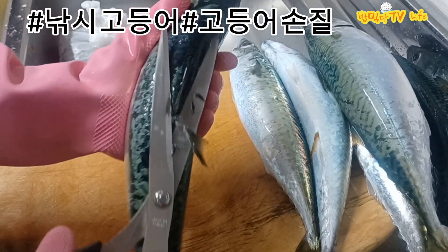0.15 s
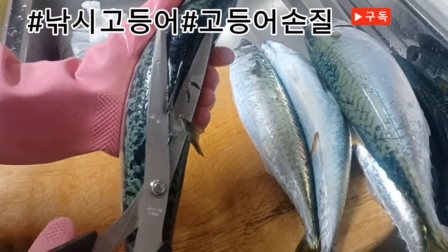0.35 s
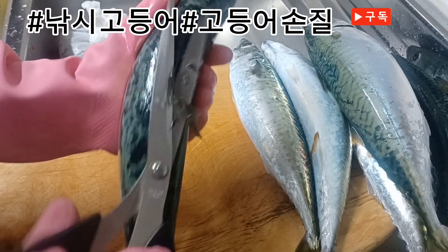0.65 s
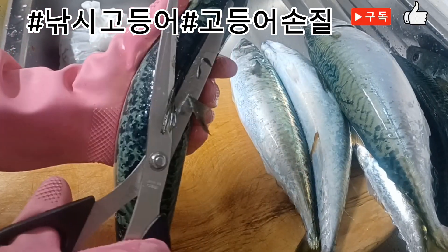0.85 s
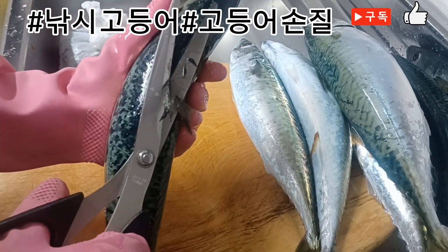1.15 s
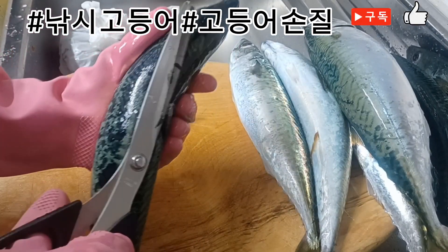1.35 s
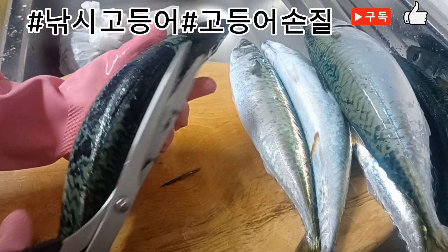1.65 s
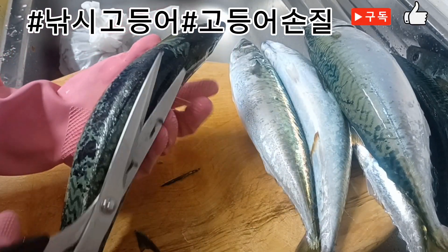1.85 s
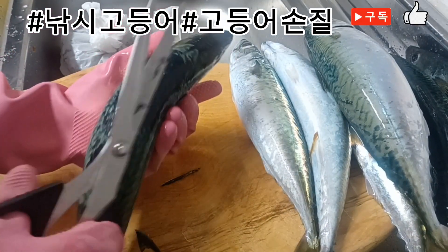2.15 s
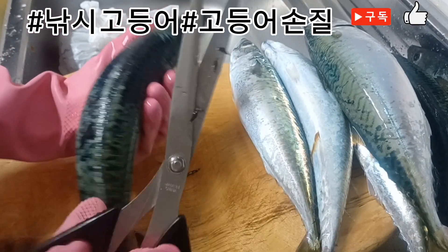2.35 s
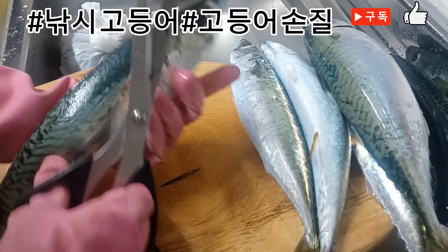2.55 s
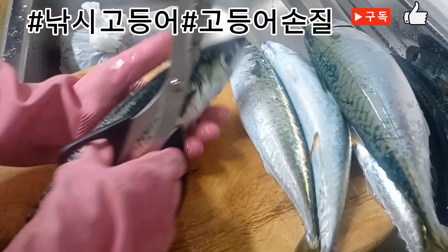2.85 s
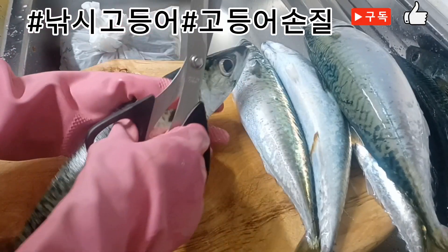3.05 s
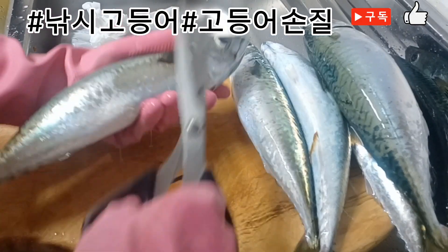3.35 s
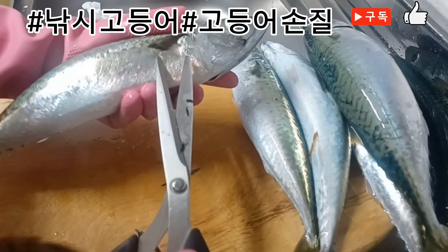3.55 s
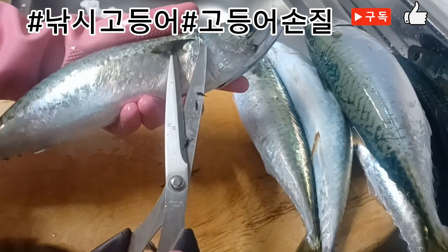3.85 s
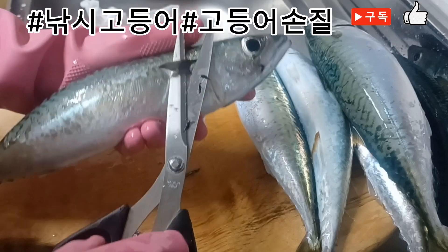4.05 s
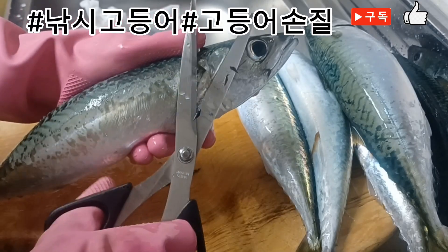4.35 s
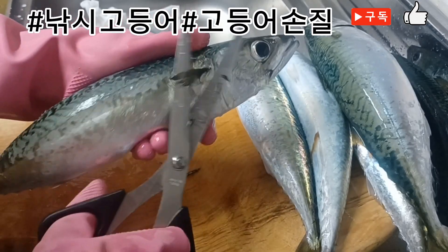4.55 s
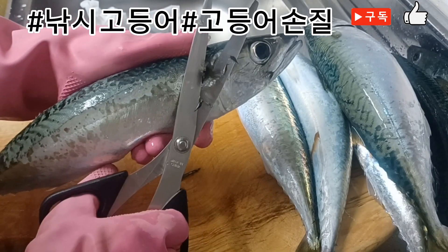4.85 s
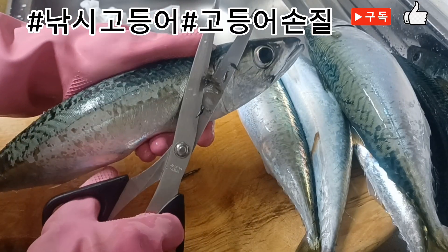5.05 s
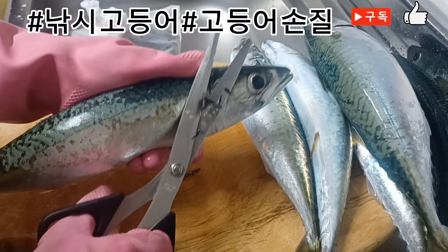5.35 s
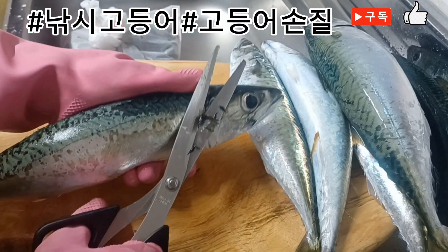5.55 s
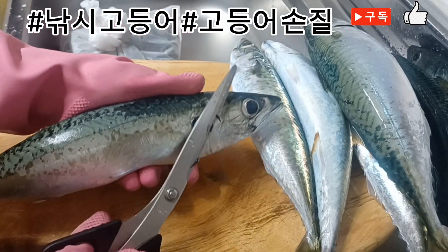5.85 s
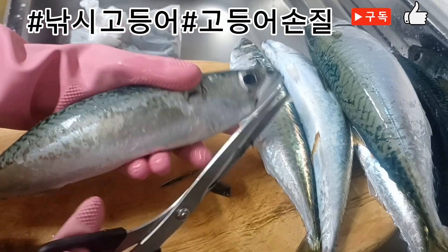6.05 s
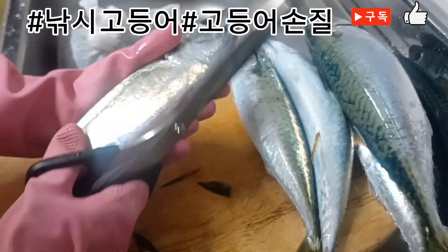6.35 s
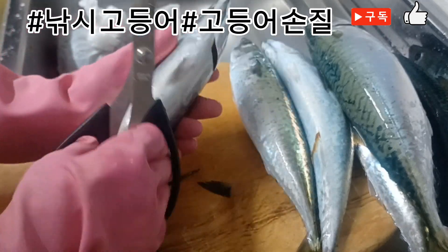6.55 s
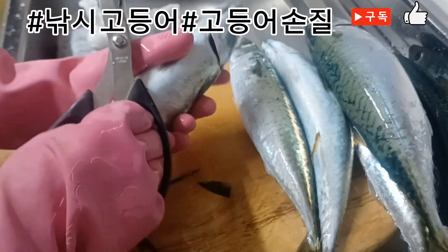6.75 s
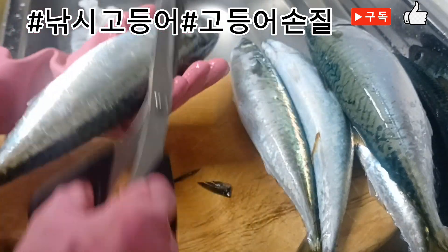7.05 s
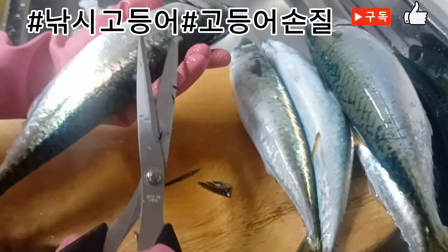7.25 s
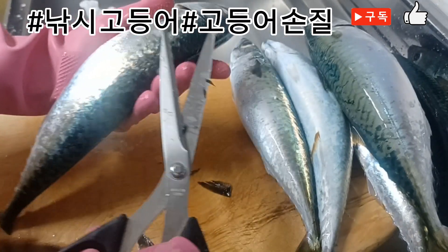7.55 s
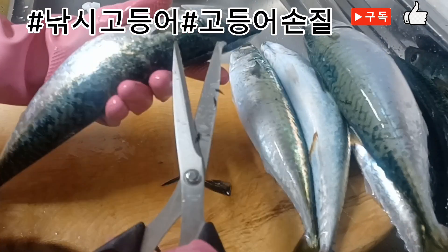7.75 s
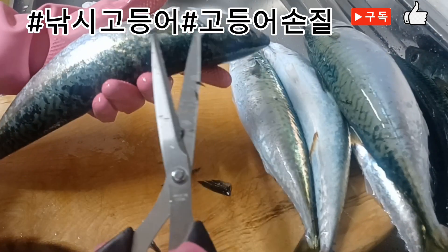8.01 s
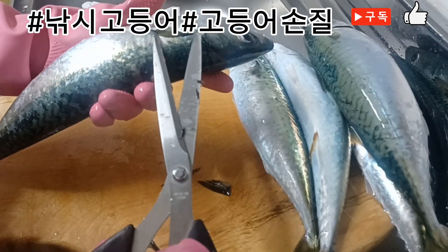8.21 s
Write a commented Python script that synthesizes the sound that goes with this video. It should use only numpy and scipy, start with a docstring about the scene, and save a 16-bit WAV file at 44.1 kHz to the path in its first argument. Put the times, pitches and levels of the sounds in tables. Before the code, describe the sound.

A close, quiet kitchen scene with short room reflections and a very faint, wavering appliance hum under soft air. In the first half second, thin wet slicing and tiny scale ticks crackle, with weak bright snips. Crisp snips follow at 0.55, 0.9 and 1.0, then two harder crunches at 1.15 and 1.3 with dull fleshy thuds and a slight steel ring. From 1.6 to 4 the gloves rub in short, grainy strokes, with small rising squelches, hollow pops, light taps and a low bump at 2.6. Small snips resume at 4.1 and 4.7, thickening from 4.9 to 5.5 into rapid, splintery crunching. At 5.8 comes the loudest cut: a bright double snap, ringing blades and a deep thud. Until about 8.4, only wet rustling, occasional squelches, soft bumps and dull blade taps continue.

```python
"""In a small kitchen, scissors cut the fins off a fresh fish held in a rubber glove above a wooden board.
Fin rays snap as bursts of splintering breaks; wet skin crackles and gloves rub as clumped, coloured grains.
Squelches are slips through a rising resonance, scale ticks are short noise flicks.
Hard cuts jolt the fish with dull, sagging thuds, and struck blades ring in groups of close modes.
Behind them, an appliance hums in wavering tones over soft air noise."""
import sys
import numpy as np
from scipy import signal
from scipy.fft import rfft, irfft
from scipy.io import wavfile
from scipy.ndimage import uniform_filter1d

SR = 44100
rng = np.random.default_rng(int(sys.argv[2]) if len(sys.argv) > 2 else 0)


def waveform_to_disk(signal):
    """Save audio, clipped to [-1, 1], as 16-bit WAV at the path in sys.argv[1]."""
    frames = np.transpose(np.atleast_2d(signal))
    scaled = np.clip(frames, -1, 1) * 32767
    samples = np.round(scaled).astype(np.int16)
    wavfile.write(sys.argv[1], SR, samples)


N = 369558

# Event levels are relative: each layer adds its own trim and pan.

# kitchen air: [f/Hz, relative density/dB]
AIR_COLOUR = [(18, -61), (30, -17.5), (103, 7), (170, -8), (221, 3.5), (449, -10.5), (569, -6), (666, 0),
              (801, -3.5), (1010, -10.5), (4650, -10), (8300, -15.5), (12600, -12), (14800, -25),
              (16000, -13.5)]
AIR_DB = -63
# appliance tones: [f/Hz, level/dB, pitch waver/Hz]
HUM_TONES = [(114, -81, 3.65), (118.5, -82.5, 6.47), (559, -78.5, 16.02), (798.4, -74.5, 1.1),
             (1283, -87, 8.07)]

# gloves sliding as the fish is turned and regripped: [t/s, length/s, level/dB, hollowness re level/dB]
RUBS = [(0, 0.31, -69.5, 6.5), (0.443, 0.05, -63.5, 4), (0.7, 0.14, -68, 3.5), (1.046, 0.086, -65.5, 6),
        (1.3, 0.11, -61, 2.5), (1.618, 0.024, -64, -6), (1.714, 0.29, -63.5, -11), (2.101, 0.016, -58, -13),
        (2.18, 0.14, -70.5, 6.5), (2.336, 0.066, -59, -1), (2.484, 0.062, -61.5, -4),
        (2.557, 0.24, -65.5, 0.5), (2.816, 0.051, -55, -7), (2.901, 0.14, -60, -5),
        (3.033, 0.044, -59, 2.5), (3.075, 0.049, -57.5, 5), (3.143, 0.042, -57.5, 1.5),
        (3.225, 0.035, -64, 5), (3.246, 0.17, -64.5, 1.5), (3.483, 0.1, -60, 1.5),
        (3.595, 0.18, -60.5, -0.5), (3.829, 0.052, -58.5, -0.5), (3.977, 0.15, -66, -19),
        (4.257, 0.13, -63.5, -3), (4.542, 0.2, -60.5, -3), (4.771, 0.41, -67, 1), (5.055, 0.21, -62.5, 8.5),
        (5.33, 0.18, -64, 4.5), (5.789, 0.069, -56, 2), (5.882, 0.6, -59, -2), (6.409, 0.034, -50.5, -4.5),
        (6.474, 0.15, -56.5, -3.5), (6.648, 0.32, -61, -3), (6.828, 0.036, -52.5, -4.5),
        (6.95, 0.3, -64, -4), (7.15, 0.14, -62.5, 5.5), (7.331, 0.035, -59, -3.5), (7.48, .15, -67.5, -3),
        (7.656, 0.16, -63.5, -11), (7.781, 0.2, -58, -2.5), (8.007, 0.12, -59, -9),
        (8.225, 0.076, -56.5, -3), (8.343, .04, -63, -1.5)]
# blades slicing through wet skin: [t/s, length/s, level/dB]
SLICES = [(.065, .16, -53.5), (0.217, 0.073, -61), (.39, 0.017, -55.5), (0.432, 0.058, -53),
          (0.65, 0.11, -58), (1.668, 0.1, -61), (2.557, 0.071, -55.5), (3.9, 0.11, -60.5),
          (4.937, 0.12, -57.5), (5.163, 0.29, -61.5), (6.26, 0.12, -56), (6.751, 0.074, -57.5),
          (8.255, .05, -52.5)]
# fine crackle of wet skin: [f/Hz, relative density/dB]
CRACKLE_COLOUR = [(30, -71), (1500, -42.5), (3000, -8.5), (5000, -2.5), (7000, -4.5), (8300, -9.5),
                  (10000, -5.5), (12500, -3.5), (15000, -4), (16000, -28)]
# rubber on skin: [f/Hz, relative density/dB]
RUB_COLOUR = [(30, -13), (400, -17.5), (800, -7.5), (1150, -7), (1290, -2), (1450, -6), (1780, -1.5),
              (2200, -4.5), (3200, -5.5), (5000, -10), (7000, -23.5), (9000, -31), (16000, -42)]
# hollow undertone under the handling, with fixed resonant peaks: [f/Hz, relative density/dB]
HOLLOW_COLOUR = [(30, -8), (70, -17.5), (115, 12), (165, -13.5), (213, 1.5), (325, 0.5), (377, 7),
                 (440, -0.5), (510, 2.5), (576, 9.5), (660, 1.5), (750, 0.5), (1000, -5), (3000, -27)]
STROKE_ATTACK_S, STROKE_RELEASE_S = 0.0051, 0.028
STROKE_UNEVEN_DB, STROKE_UNEVEN_HZ = 2, 27.5   # the rubber catches and slips
GRIP_DB, GRIP_HOLLOW_DB = -73, -70   # steady floors under the strokes
RUB_WET_DB = 0.5   # crackle that comes with the rubbing, relative to it

# wet rubber squelching on the skin: [t/s, length/s, level/dB, middle f/Hz]
SQUELCHES = [(1.928, 0.032, -56.5, 1900), (1.981, 0.019, -54, 1700), (2.119, .02, -54, 1500),
             (2.211, 0.011, -57, 1400), (2.351, 0.071, -57, 1870), (3.202, 0.033, -50, 1730),
             (3.326, 0.027, -59, 1500), (3.5, 0.069, -63, 1300), (3.645, 0.014, -58, 1400),
             (3.705, 0.0097, -69, 1900), (3.845, .04, -67, 1700), (4.257, .025, -50, 1900),
             (6.051, .07, -58.5, 1400), (6.156, 0.021, -55, 1800), (6.95, .025, -62.5, 1650),
             (7.154, 0.021, -58.5, 1700), (7.356, 0.017, -62, 1810), (7.684, 0.012, -59, 2000)]
SQUELCH_WIDTH_HZ, SQUELCH_GLIDE = 930, .2   # glide: rise as a share of the pitch

# single scales flicking off the blade edge: [t/s, level/dB]
SCALE_TICKS = [(.426, -57), (.173, -59), (.194, -52), (.205, -56), (.230, -56), (.241, -54), (.253, -47),
               (.441, -56), (.47, -53), (5.005, -59), (5.175, -48), (1.276, -54), (5.25, -49), (5.369, -50),
               (5.3765, -50), (6.755, -50.5), (6.795, -63)]
RANDOM_TICKS_PER_S, RANDOM_TICK_DB = 55, -7.5   # during slices; least level relative to the slice

# two swings of the hand-held fish, flesh and whole body: [f/Hz at the usual jolt level, t60/s]
FISH_MODES = [(270, 0.054), (105.6, 0.19)]
# hard cuts and regrips: [t/s, flesh level/dB, whole-body level/dB]
JOLTS = [(0.548, -55.5, -53), (0.924, -50, -64), (1.013, -48.5, -54), (1.158, -40, -53), (1.308, -37, -54),
         (1.34, -52, -47.5), (1.362, -46, -48), (1.43, -69, -53.5), (1.962, -55.5, -57.5),
         (2.6207, -48, -45), (2.6295, -41, -44), (2.657, -45, -52), (2.683, -50, -58), (2.712, -53, -46.5),
         (3.474, -56, -52.5), (5.803, -32.5, -38), (5.823, -35, -54), (5.836, -39, -26),
         (5.895, -47.5, -52), (5.925, -52, -45.5), (5.976, -75, -58), (6.061, -72, -53), (6.29, -48.5, -51),
         (6.576, -60, -51.5), (7.16, -54, -60), (7.235, -57, -57), (7.269, -56, -54.5), (7.854, -59, -48)]
SOFTENING_PER_DB, USUAL_JOLT_DB = .005, -40   # harder jolts swing lower
# hollow pops of the cupped glove on wet skin: [t/s, level/dB, f/Hz]
POPS = [(.178, -50.5, 365), (.738, -41, 376), (0.925, -45, 292), (2.123, -48, 594), (2.62, -46.5, 502),
        (2.636, -48, 365), (2.712, -51, 567), (3.222, -47, 380), (3.524, -51.5, 380), (4.6, -53, 385),
        (5.164, -39.5, 622), (5.322, -45.5, 588), (7.223, -52, 392)]
POP_T60_S = 0.09
# heavy jolts carried into the arm as a deep bump: [t/s, level/dB]
ARM_BUMPS = [(2.629, -43), (5.836, -37)]
BUMP_HZ, BUMP_T60_S = 73, 0.17

# steel blades damped by the wet fish, in groups of modes: [f/Hz, spread/Hz, relative level/dB, t60/s]
BLADE_MODES = [(3320, 220, -5, 0.16), (3860, 220, 0.5, 0.16), (5130, 350, 5, 0.061),
               (11700, 580, -7, 0.074)]
# blades breaking through and clashing: [t/s, level/dB]
CLASHES = [(1.1563, -45), (1.307, -51), (5.811, -29)]

# dull taps of blades and handles on each other, fish and glove: [t/s, level/dB]
TAPS = [(1.083, -51), (1.397, -52.5), (1.951, -59), (1.984, -55.5), (2.075, -46), (2.195, -52.5),
        (2.476, -53), (2.548, -44.5), (2.943, -47), (3.091, -58), (3.166, -48), (3.222, -67), (3.506, -58),
        (3.763, -48.5), (4.068, -54), (5.637, -50.5), (5.831, -44), (5.862, -49), (6.09, -48.5),
        (6.212, -59), (6.447, -58), (6.611, -53), (6.754, -55), (6.85, -50), (7.469, -54), (7.557, -55),
        (7.783, -47.5), (7.841, -53), (7.965, -55), (8.072, -51.5), (8.108, -46.5), (8.183, -47.5),
        (8.211, -48), (8.298, -54)]
TAP_LENGTH_S, TAP_BRIGHT_DB, TAP_SQUASH_DB, TAP_HZ, TAP_RIGHT_DB = .0035, -1.5, -1, 4510, 2.5
# fin rays snapping between the blades: [t/s, crunch time scale/s, level/dB, brightness re level/dB,
# soft-tissue squash re level/dB, f/Hz, right minus left/dB]
SNIPS = [(.073, 0.016, -60.5, 21.5, -7, 6000, 6), (.135, 0.003, -65.5, 26, -10, 6000, 4),
         (.446, .003, -56, 21, -9, 6000, 0), (.546, 0.0031, -45, 7.5, -3.5, 4530, 1),
         (.9137, .0009, -39.5, 11.5, -5.5, 7000, 0), (1.014, 0.0017, -41, 2.5, -8.5, 6550, -0.5),
         (1.156, .0015, -33.5, -1, -10, 3930, -0.5), (1.3075, 0.0027, -34, -1, -9.5, 4170, -2),
         (1.312, 0.0046, -36, 3, -5, 4280, 1), (4.133, 0.0054, -45.5, 3.5, -6.5, 8400, 2),
         (4.256, 0.0023, -47, 8.5, -6, 7500, 4), (4.272, .003, -43.5, 2, -9, 4440, 1),
         (4.661, 0.0043, -51, 3, -16, 5500, 3), (4.853, 0.002, -56.5, 0, -12, 5500, 4),
         (4.934, 0.0033, -51, 2, -9, 6570, 7), (4.953, 0.0062, -48.5, 2, -4.5, 6260, 4),
         (4.994, .002, -53.5, 6, -9, 5400, 7), (5.028, 0.0016, -46, -6, -14, 4500, 3),
         (5.06, 0.0039, -48, -2, -8, 4500, 3), (5.0905, 0.00092, -46.5, 3, -19, 4400, 3),
         (5.1, 0.0054, -45.5, 4, -8, 5800, 3), (5.163, .005, -52, 0, 1, 6000, 2),
         (5.174, 0.0034, -51, 7, -1, 6100, 5), (5.184, .002, -42, 2, -7, 4370, 0),
         (5.233, 0.0015, -46.5, 9.5, -5, 9000, 5), (5.251, 0.0063, -43.5, 2, -4, 4500, 3),
         (5.27, .004, -49, -7, -7, 4500, 0), (5.294, 0.00075, -41.5, 4.5, -6.5, 4330, 2),
         (5.322, 0.0035, -48.5, -14, 2.5, 4500, 1), (5.359, 0.0019, -44, 1.5, -8, 4230, 1),
         (5.377, 0.0041, -42.5, 3, -7, 4460, 3), (5.417, 0.0017, -47, 1, -0.5, 4800, 1),
         (5.454, 0.0046, -51.5, 4, -5, 4800, 3), (5.488, 0.0018, -48, 5, -4, 4170, 5),
         (5.495, 0.003, -44.5, -1, -13, 4400, 0), (5.681, 0.00097, -45.5, 0, -23, 5360, 2),
         (5.691, 0.0036, -45.5, 2, -16, 5700, 1), (5.742, 0.0034, -47.5, 3.5, -2, 4600, 2),
         (5.786, 0.0028, -48, 0, -15, 5200, -3), (5.8005, 0.0018, -31.5, 3, -7, 5200, 2),
         (5.8045, 0.003, -27, 6, -8, 3240, 2), (5.8108, 0.0017, -25.5, -0.5, -5.5, 5100, 0),
         (5.8155, 0.0028, -38, -11, -2, 5300, -4)]
# crisp top of a snap: [f/Hz, relative density/dB]
SNAP_TOP_COLOUR = [(30, -57), (5000, -33), (8300, -12), (10000, -6), (11700, -1), (13000, -1.5),
                   (14000, 1.5), (15000, -7.5), (16000, -4.5)]
# hard middle of a snap: [f/Hz, relative density/dB]
SNAP_MIDDLE_COLOUR = [(30, -7), (1300, -18), (2500, -18), (3250, -2), (5000, -1), (7000, -0.5),
                      (8400, -7.5), (12000, -12)]
# low squash of a snap: [f/Hz, relative density/dB]
SNAP_LOW_COLOUR = [(30, -28), (160, -24), (260, -8), (500, -6), (900, -3), (1400, -2), (2400, -2),
                   (3500, -1), (9000, -48)]
SNAP_PEAK_DB, SNAP_PEAK_WIDTH_HZ = 3.5, 580   # resonance added at the pitch of the ray; half width

BURST_GAIN = np.sqrt(SR / 200)   # lifts energy 1 to rms 1 over 5 ms
CUTOFF_HZ = 15650


def from_db(db):
    """Decibels to gain."""
    return 10 ** (np.asarray(db) / 20)


def rms_one(x):
    """Scale to rms 1."""
    return x / np.sqrt(np.mean(x ** 2) + 1e-20)


def unit_energy(x):
    """Scale each channel to energy 1."""
    return x / np.sqrt(np.sum(x ** 2, axis=-1, keepdims=True) + 1e-20)


def add(out, s, sound):
    """Mix a stereo sound in at time s."""
    start = max(round(s * SR), 0)
    part = sound[:, :max(N - start, 0)]
    out[:, start:start + part.shape[1]] += part


def panned(x, right_db):
    """Make the right channel louder than the left by right_db."""
    return x * from_db(np.array([[-.5], [.5]]) * right_db)


def drift(rate):
    """Slow random wander of rms 1: noise smoothed by two poles at rate Hz."""
    step = 40   # samples between wander points
    r = np.exp(-2 * np.pi * rate * step / SR)
    noise = rng.standard_normal(N // step + 2002)
    slow = signal.lfilter([1], [1, -2 * r, r * r], noise)[2000:]   # skip the filter's start
    return np.interp(np.arange(N) / step, np.arange(len(slow)), rms_one(slow))


def gains(points, size=2048):
    """A spectrum as gains of rms 1 on an even frequency grid."""
    hz, db = np.transpose(points)
    grid = np.maximum(np.arange(size // 2 + 1) * SR / size, 1)
    return rms_one(from_db(np.interp(np.log(grid), np.log(hz), db)))


def causal(gain):
    """Minimum-phase response of energy 1 with the given relative gains, by folding the cepstrum."""
    cepstrum = irfft(np.log(np.atleast_2d(gain) + 1e-12))
    half = cepstrum.shape[1] // 2
    cepstrum[:, 1:half] *= 2
    cepstrum[:, half + 1:] = 0
    return unit_energy(irfft(np.exp(rfft(cepstrum))))


def colour(points, size=2048):
    """Causal response of energy 1 with the given spectrum."""
    return causal(gains(points, size=size))


def through(x, response):
    """Filter sound by a response, keeping its length."""
    return signal.oaconvolve(x, response, axes=1)[:, :x.shape[1]]


def even(x, width_hz=700, size=8192):
    """Level the broad peaks and gaps of a random burst, so that it sounds solid; energy 1."""
    width = max(int(width_hz * size / SR), 1)
    power = uniform_filter1d(np.abs(rfft(x, size)) ** 2, width)
    return unit_energy(through(x, causal(1 / np.sqrt(power + 1e-12))))


def dying_noise(t60, size):
    """Dense stereo reflections of energy 1, as exponentially fading noise."""
    fade = from_db(-60 * np.arange(size) / SR / t60)
    return unit_energy(rng.standard_normal((2, size)) * fade)


def path(near_db=0.0, near_t60=0.057, room_db=-6.0, room_t60=0.16, size=8000):
    """From the hands to the microphones: direct sound, scatter off board and hands, then the kitchen."""
    scatter = from_db(near_db) * dying_noise(near_t60, size)
    response = scatter + from_db(room_db) * dying_noise(room_t60, size)
    response[0, 0] += 1
    response[1, rng.integers(3, 9)] += 1   # direct sound is slightly later on the right
    return unit_energy(response)


def moving(x, count=100):
    """The hands keep moving, so each short stretch of sound takes a new path."""
    out = np.zeros((2, N))
    for stretch in np.array_split(np.arange(N), count):
        response = even(path(size=4096), size=4096)
        add(out, stretch[0] / SR, signal.fftconvolve(x[None, stretch], response, axes=1))
    return out


def stereo_noise(spectrum, alike_hz, size=4096):
    """Diffuse noise of rms 1: alike in both channels in the bass, growing unrelated above alike_hz."""
    mid, side = rng.standard_normal((2, N))
    side = signal.sosfilt(signal.butter(1, alike_hz, "high", fs=SR, output="sos"), side)
    return rms_one(through(np.array([mid + side, mid - side]), colour(spectrum, size=size)))


def background(flutter_db=2.5):
    """Still kitchen air as coloured noise, under appliance tones that waver in pitch and level."""
    hum = 0
    for hz, db, waver in HUM_TONES:
        phase = 2 * np.pi * np.cumsum(hz + waver * drift(11.77)) / SR
        level = np.sqrt(2) * from_db(db + flutter_db * drift(29.0))   # sqrt(2): a sine of rms 1
        hum = hum + level * np.sin(phase)
    return hum + from_db(AIR_DB) * stereo_noise(AIR_COLOUR, alike_hz=507)


def grains(per_s, spread_db, clump_db):
    """Tiny stick-slip releases of uneven size that come in brief clumps; rms 1."""
    sizes = from_db(spread_db * np.minimum(rng.exponential(1, N), 4)) * rng.choice([-1, 1], N)
    released = rng.random(N) < per_s / SR
    return rms_one(sizes * released * from_db(clump_db * drift(80)))


def strokes(rows):
    """Gain of a series of strokes (start, length, dB): attack, hold, release; overlaps add in power."""
    t, power = np.arange(0, N, 20) / SR, 0
    for start, length, db in rows:
        attack = np.clip((t - start) / STROKE_ATTACK_S, 0, 1)
        release = np.exp(-np.maximum(t - start - length, 0) / STROKE_RELEASE_S)
        power = power + (from_db(db) * attack * release) ** 2
    return np.interp(np.arange(N) / SR, t, np.sqrt(power))


def handling(hollow_db=-2.0, crackle_right_db=1.5):
    """Wet skin crackles finely, rubber rubs more dully, and a hollow undertone rings at fixed resonances."""
    catching = from_db(STROKE_UNEVEN_DB * drift(STROKE_UNEVEN_HZ))
    rub_strokes = strokes([(s, length, db) for s, length, db, _ in RUBS])
    hollow_strokes = strokes([(s, length, db + cupped) for s, length, db, cupped in RUBS])
    # np.hypot adds levels in power
    rubbing = catching * np.hypot(from_db(GRIP_DB), rub_strokes)
    wet = np.hypot(from_db(RUB_WET_DB) * rubbing, catching * strokes(SLICES))
    hollow = np.hypot(from_db(GRIP_HOLLOW_DB), hollow_strokes)

    crackle_grains = grains(per_s=1500, spread_db=2.0, clump_db=3.0)
    crackle = through(moving(wet * crackle_grains), colour(CRACKLE_COLOUR))
    rub_grains = grains(per_s=2200, spread_db=1.5, clump_db=3.0)
    rub = through(moving(rubbing * rub_grains), colour(RUB_COLOUR))
    undertone = hollow * stereo_noise(HOLLOW_COLOUR, alike_hz=630) * from_db(2.0 * drift(4.3))
    return panned(crackle, crackle_right_db) + rub + from_db(hollow_db) * undertone


def squelches(squelch_db=-1.5, slips_per_s=900, count=4):
    """Quick slips of wet rubber ring a small pocket of air, whose pitch climbs as it is squeezed."""
    out = np.zeros((2, N))
    r = np.exp(-np.pi * SQUELCH_WIDTH_HZ / SR)
    for start, length, db, hz in SQUELCHES:
        size, heard = int(length / count * SR), path()
        for k in range(count):   # the pitch climbs in steps
            push, chance = rng.random((2, size))
            slips = (push - .5) * np.where(chance < slips_per_s / SR, 1, .05)   # weak hiss between slips
            w = 2 * np.pi * hz * (1 + SQUELCH_GLIDE * (k / (count - 1) - .5)) / SR
            resonance = [1, -2 * r * np.cos(w), r * r]
            pocket = signal.lfilter([1, 0, -1], resonance, np.pad(slips, (0, 200)))
            sound = unit_energy(signal.fftconvolve(pocket[None], heard, axes=1))
            add(out, start + k * length / count, from_db(db + squelch_db) * np.sqrt(size) * sound)
    return out


def scale_ticks(flick_s=0.00086, size=3000):
    """Scales flick off the edge as dry, sharp ticks that stand out of the slicing hiss."""
    t, out = np.arange(size) / SR, np.zeros((2, N))
    tone = colour(CRACKLE_COLOUR, size=256)
    rows = list(SCALE_TICKS)
    for start, length, db in SLICES:
        draws = rng.random((24, 3))
        odds = RANDOM_TICKS_PER_S * length / len(draws)
        rows += [(start + when * length, db + RANDOM_TICK_DB + 6 * hard)
                 for when, hard, chance in draws if chance < odds]
    for s, db in rows:
        flick = unit_energy(rng.standard_normal((1, size)) * np.exp(-t / flick_s))
        heard = through(through(path(near_db=-5.0, room_db=-9.0, size=size), flick), tone)
        add(out, s, from_db(db) * unit_energy(heard) * BURST_GAIN)
    return out


def knocks():
    """A jolt rings both modes of the fish, a pop the hollow of the glove, a bump the arm: (s, dB, Hz, t60 s)."""
    rows = []
    for s, *levels in JOLTS:
        for db, (hz, t60) in zip(levels, FISH_MODES):
            rows.append((s, db, hz * (1 - SOFTENING_PER_DB * (db - USUAL_JOLT_DB)), t60))
    rows += [(s, db, hz, POP_T60_S) for s, db, hz in POPS]
    return rows + [(s, db, BUMP_HZ, BUMP_T60_S) for s, db in ARM_BUMPS]


def thuds(sag=0.0089, push_s=0.0027, flesh_db=-15, flesh_t60=0.14, room_db=-20.5, room_t60=0.33, size=16000):
    """A soft push rings the hand-held fish briefly; its pitch sags as the grip gives, and the room answers."""
    t, out = np.arange(size) / SR, np.zeros((2, N))
    for s, db, hz, t60 in knocks():
        phase = 2 * np.pi * np.cumsum(hz * (1 + sag * (np.exp(-t / 0.12) - .5))) / SR
        swing = np.sin(phase) * from_db(-60 * t / t60)
        # an octave of noise around the pitch, dying in flesh and room
        band = signal.butter(2, hz * 2 ** np.array([-.5, .5]), "band", fs=SR, output="sos")
        fade = from_db(flesh_db - 60 * t / flesh_t60) + from_db(room_db - 60 * t / room_t60)
        wobble = rms_one(signal.sosfilt(band, rng.standard_normal(size))) * fade
        push = 1 - np.exp(-t / push_s)
        add(out, s, np.tile(from_db(db) * push * (swing + wobble), (2, 1)))
    return out


def blade_ring(t, count=8):
    """The blades ring a little differently at each opening angle: scattered, fading modes; energy 1."""
    ring = 0
    for hz, spread, db, t60 in BLADE_MODES:
        pitches = hz + spread * rng.standard_normal(count)
        modes = rng.choice([-1, 1], count) @ np.sin(2 * np.pi * np.outer(pitches, t))
        ring = ring + from_db(db - 60 * t / t60) * modes
    return unit_energy(ring)[None]


def clashes(size=8000):
    """Steel meets steel at the end of a hard cut and the blades ring out."""
    t, out = np.arange(size) / SR, np.zeros((2, N))
    for s, db in CLASHES:
        ring = from_db(db) * blade_ring(t) * BURST_GAIN
        add(out, s, signal.fftconvolve(ring, path(), axes=1))
    return out


def contacts():
    """Snips and taps alike, with the columns of SNIPS."""
    taps = [(s, TAP_LENGTH_S, db, TAP_BRIGHT_DB, TAP_SQUASH_DB, TAP_HZ, TAP_RIGHT_DB) for s, db in TAPS]
    return list(SNIPS) + taps


def crack(middle_db, top_db, hz):
    """One break: a hard middle that peaks at the pitch of the ray, and a crisp top."""
    middle = gains(SNAP_MIDDLE_COLOUR)
    off_pitch = (np.linspace(0, SR / 2, len(middle)) - hz) / SNAP_PEAK_WIDTH_HZ
    middle = rms_one(middle * (1 + from_db(SNAP_PEAK_DB) / (1 + off_pitch ** 2)))
    both = np.hypot(from_db(middle_db) * middle, from_db(top_db) * gains(SNAP_TOP_COLOUR))
    return np.sqrt(np.mean(both ** 2)) * causal(both)


def snips(top_db=0.7, middle_db=0.65, low_db=-0.53, splinter_db=2.5, ring_db=-22.0, flesh_t60=0.053,
          rise=0.62, fall=0.77, size=5000):
    """Each snap is one main break amid splintering fibres; it sets the blades ringing and squashes the flesh."""
    t, out, low = np.arange(size) / SR, np.zeros((2, N)), colour(SNAP_LOW_COLOUR)
    for s, length, level, bright, squashed, hz, right_db in contacts():
        # fibres start to give just before the main break and go on tearing after it
        since = t / length - 2.5   # in crunch time scales
        tearing = np.exp(-np.abs(since) / np.where(since < 0, rise, fall))
        fibres = unit_energy(rng.standard_normal(size) ** 3 * tearing)   # cubing makes them spiky
        breaks = from_db(splinter_db) * np.sqrt(length * 1000) * fibres   # longer crunches hold more fibres
        breaks[np.argmax(tearing)] += 1

        snap = crack(level + middle_db, level + bright + top_db, hz)
        flesh = through(even(dying_noise(flesh_t60, size)[:1]), low)
        squash = from_db(level + squashed + low_db) * flesh
        body = squash + from_db(level + ring_db) * blade_ring(t)
        body[:, :snap.shape[1]] += snap

        way = path(near_db=-2.5, near_t60=.05, room_db=-7.0, room_t60=.2)
        heard = even(through(way, breaks[None])) * BURST_GAIN
        add(out, s - 2 * length, panned(signal.fftconvolve(heard, body, axes=1), right_db))
    return out


def scene(thuds_right_db=4.0, hands_right_db=0.5, kitchen_right_db=2.5):
    """Kitchen, hands and cuts together; the work is heard slightly right of centre."""
    kitchen = panned(background(), kitchen_right_db)
    hands = panned(handling() + squelches() + scale_ticks(), hands_right_db)
    jolted = panned(thuds(), thuds_right_db)
    cuts = clashes() + snips()
    return kitchen + hands + jolted + cuts


def record(dry):
    """The microphone drops the deep bass; the top is cut steeply."""
    thin = signal.sosfilt(signal.butter(4, 59, "high", fs=SR, output="sos"), dry)
    return signal.sosfilt(signal.ellip(10, .3, 70, CUTOFF_HZ, fs=SR, output="sos"), thin)


dry = scene()
out = record(dry)
waveform_to_disk(out)
```